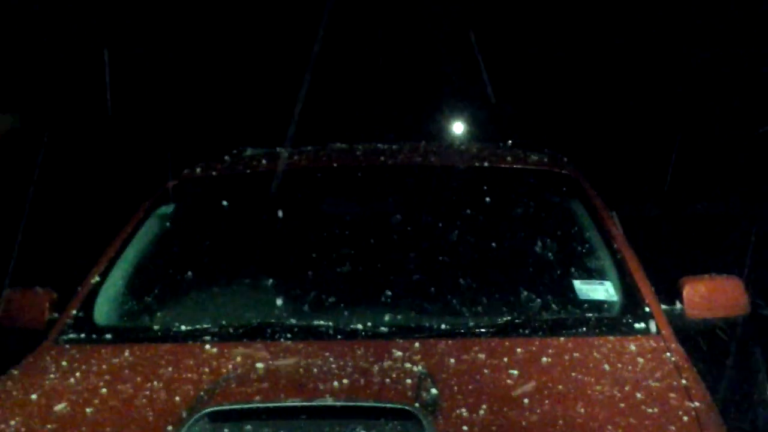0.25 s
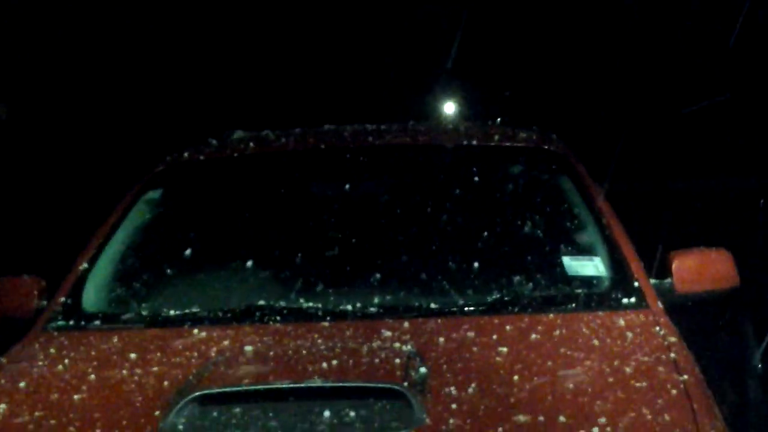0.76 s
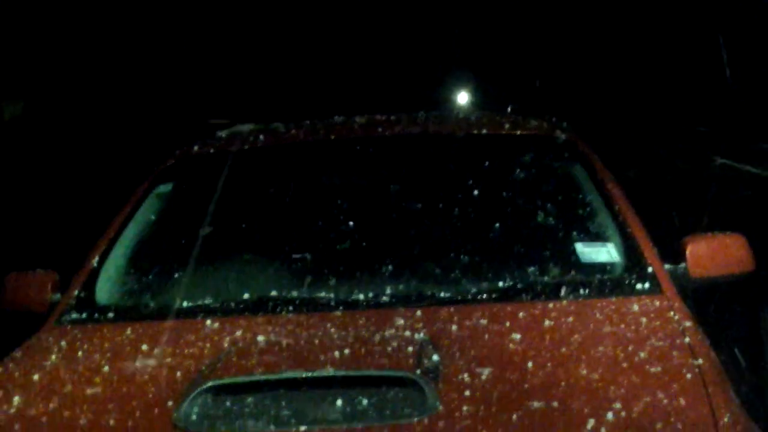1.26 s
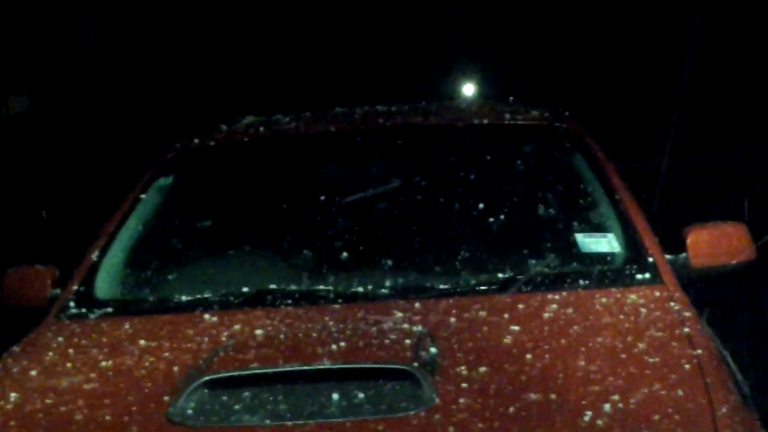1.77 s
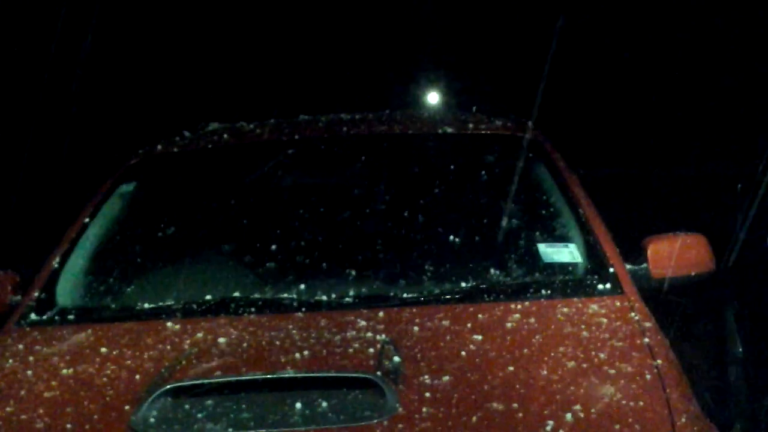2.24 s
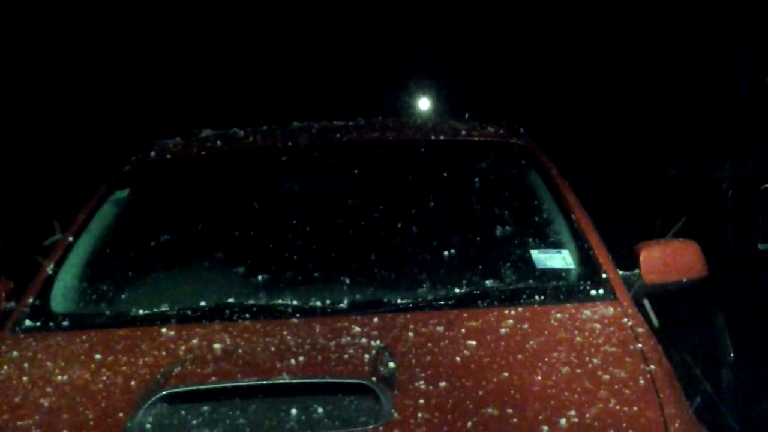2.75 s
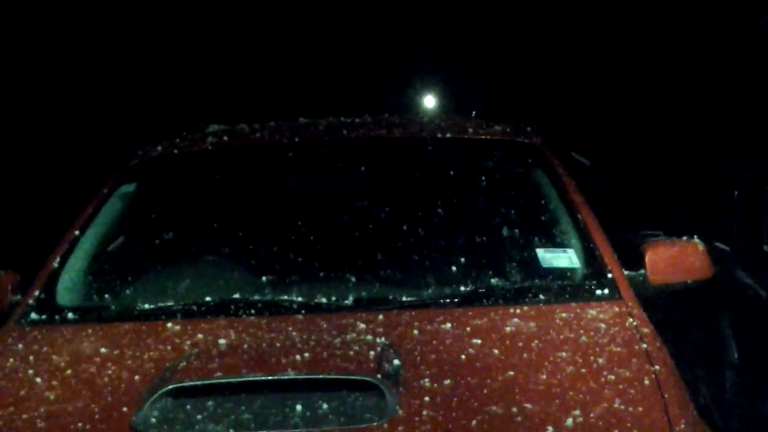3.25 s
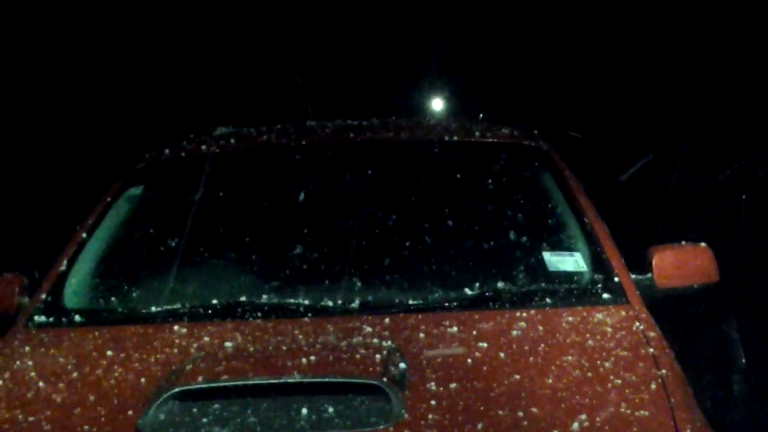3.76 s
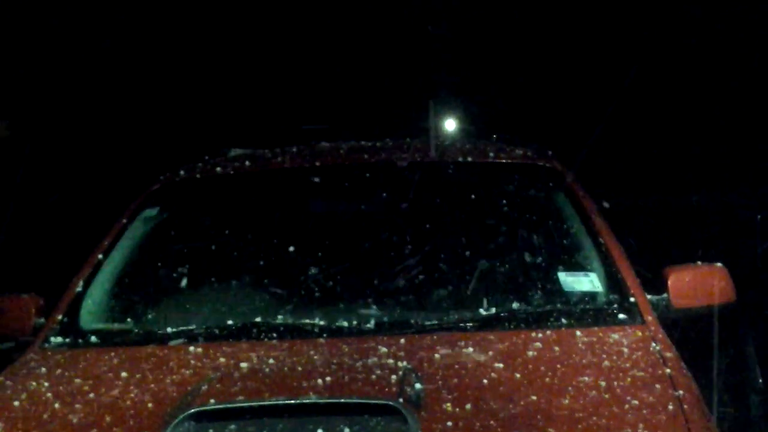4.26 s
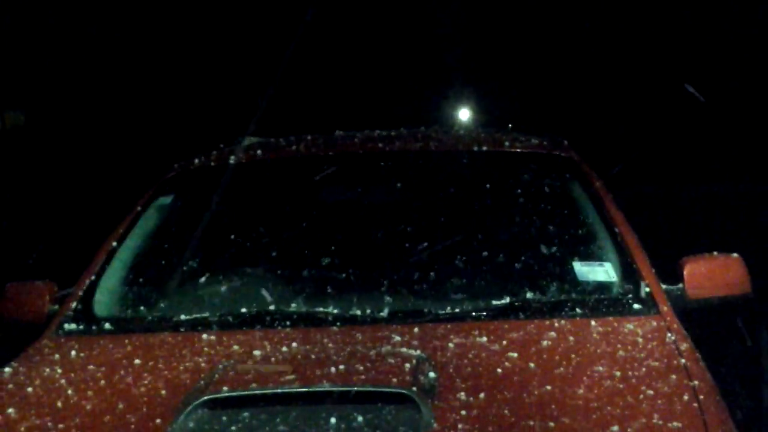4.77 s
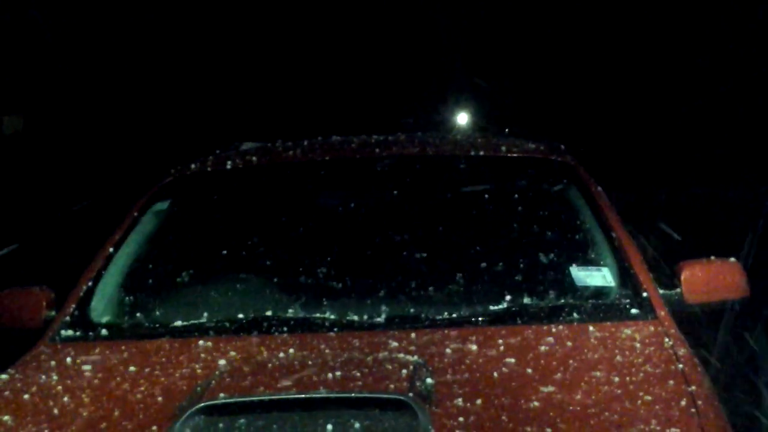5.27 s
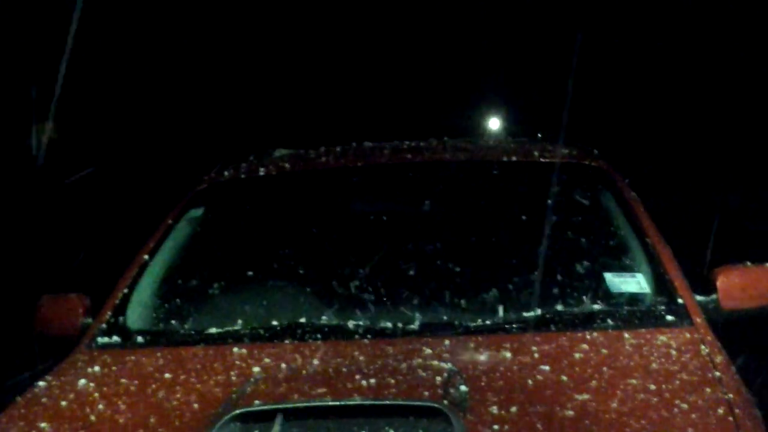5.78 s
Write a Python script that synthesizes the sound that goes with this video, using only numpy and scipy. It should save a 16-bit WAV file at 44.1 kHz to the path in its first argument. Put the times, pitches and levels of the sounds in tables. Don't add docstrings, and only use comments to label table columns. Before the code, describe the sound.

Heavy hail hammers a parked car at night, a dense metallic roar with crisp icy clatter and occasional sharp cracks of bigger stones.

```python
import sys
import numpy as np
from scipy import signal
from scipy.fft import rfft, irfft, dct
from scipy.io import wavfile

SR = 44100
rng = np.random.default_rng(int(sys.argv[2]) if len(sys.argv) > 2 else 0)


def wav_out(sig):
    wavfile.write(sys.argv[1], SR, np.round(np.clip(np.atleast_2d(sig).T, -1, 1) * 32767).astype(np.int16))


def how_loud(loudness_db):
    steps = np.asarray(loudness_db, float) / 20
    return 10 ** steps


N = 265299


def unit(x):
    return x / np.sqrt(np.mean(x ** 2) + 1e-20)


def coloured(x, points):
    m = 8192
    hz, db = np.transpose(points)
    gain = how_loud(np.interp(np.log(np.fft.rfftfreq(m, 1 / SR) + 1), np.log(hz), db))
    cepstrum = irfft(np.log(gain + 1e-6), m)
    cepstrum[1:m // 2] *= 2
    cepstrum[m // 2 + 1:] = 0
    response = irfft(np.exp(rfft(cepstrum)), m)
    return signal.fftconvolve(x, response)[:N]


def curves(rows):
    s, *columns = np.transpose(rows)
    return [np.interp(np.arange(N) / SR, s, column) for column in columns]


def surges(rows):
    t = np.arange(N) / SR
    return sum(db * np.exp(-abs(t - s) / np.where(t < s, rise_s, fade_s)) for s, db, rise_s, fade_s in rows)


def noise_bands(count, samples, centre_hz, log_widths):
    hz = np.fft.rfftfreq(samples, 1 / SR)
    bells = [np.exp(-(np.log((hz + 1) / c) / o) ** 2) for c, o in zip(centre_hz, log_widths)]
    noise = rng.standard_normal((count, samples))
    return [unit(band) for band in irfft(rfft(noise) * np.array(bells), samples)]


def impacts(count, spread_db, t60):
    hop, spots = 8192, 10
    spells = N // hop + 2
    t = np.arange(hop) / SR
    draw = rng.random((count, 2))
    size = how_loud(-spread_db * np.log(1 - draw[:, 1]))
    when = (draw[:, 0] * spells * spots * hop).astype(int)
    blows = np.bincount(when, size, spells * spots * hop)
    rings = rng.standard_normal((spells, spots, hop)) * how_loud(-60 * t / t60)
    spectra = rfft(blows.reshape(rings.shape), 2 * hop) * rfft(rings, 2 * hop)
    sound = irfft(spectra.sum(1), 2 * hop)
    return (sound[1:, :hop] + sound[:-1, hop:]).ravel()[:N]


def hail_fall():
    # [dB, brighter splinters]
    fall = [(0, -28.5, -1.5), (.4, -33, 2), (.8, -28.5, 0), (1.3, -30.5, 3.5), (1.6, -29, -8.5),
            (2, -29, 1), (2.45, -33, 1), (2.6, -32.5, 3), (2.9, -32, 1.5), (3.3, -29.5, 3),
            (3.55, -31.5, 0), (4.1, -30, 3), (4.35, -32, -2), (4.6, -28.5, 0.5), (5.1, -29.5, 2),
            (5.6, -29, 0), (5.8, -29, 0), (6.02, -31, 2)]
    # peak_s, over_fall_db [dB], fade_s
    flurries = [(.21, -4, 0.054), (0.251, 3, 0.025), (.3, 7.5, 0.037), (0.519, 5, 0.042), (0.865, 7, 0.021),
                (1.047, -0.5, 0.034), (1.09, -5.5, 0.036), (1.17, 5, 0.044), (1.541, 3.5, .05),
                (1.65, -3.5, 0.012), (1.68, 2, 0.033), (1.74, 3, 0.013), (1.825, 6, 0.014),
                (1.96, 1.5, 0.011), (2.26, 9.5, 0.012), (2.41, 6.5, 0.021), (2.58, 5, 0.046),
                (2.732, 1.5, 0.15), (3.03, 1.5, 0.042), (3.12, 0.5, .04), (3.278, 1.5, 0.057),
                (3.38, 3.5, 0.042), (4.2, 0.5, 0.086), (4.469, 5.5, .07), (4.88, 4, 0.068),
                (5.03, 3.5, 0.035), (5.23, 3, 0.015), (5.31, 3.5, 0.054), (5.46, 4, 0.028),
                (5.968, 6, 0.01)]
    gather_s = 0.016
    fall_db, hard_db = curves(fall)
    ice_db = fall_db + surges([(s, db, gather_s, fade_s) for s, db, fade_s in flurries])
    return ice_db, ice_db - ice_db.mean(), hard_db


def fine_spray(swing_db, hard_db):
    # frequency_hz, level_db
    spray_colour = [(9000, -19.5), (10300, -5), (11200, 0), (12000, -1), (13000, -9.5), (14400, -12.5),
                    (15000, -62)]
    spray = unit(coloured(impacts(count=30000, spread_db=1.5, t60=0.024), spray_colour))
    return how_loud(-53 + 0.55 * swing_db + 0.84 * hard_db) * spray


def glass_bursts():
    # start_s, peak_db, centre_hz, t60_s
    glass_hits = [(.05, -39, 11500, 0.14), (.862, -31, 11400, 0.083), (1.165, -30, 10600, .06),
                  (1.232, -34, 11400, 0.15), (1.684, -30, 13200, .14), (2.6, -42, 11800, 0.091),
                  (3.29, -38, 13000, 0.085), (4.43, -32, 12400, 0.11), (4.99, -34, 12600, 0.1),
                  (5.539, -37, 12200, 0.054), (5.95, -46, 12700, 0.06)]
    out, t = np.zeros(N + SR), np.arange(SR // 6) / SR
    for s, db, centre_hz, t60 in glass_hits:
        splash, = noise_bands(1, len(t), [centre_hz], [0.17])
        envelope = how_loud(db - 60 * t / t60) * (1 - np.exp(-t / 0.0062))
        out[round(s * SR):][:len(t)] += envelope * splash
    return out[:N]


def near_stones():
    # start_s, crack_peak_db, snap_over_crack_db, knock_over_crack_db
    big = [(0.0365, -27, -15, 12), (.2965, -12.5, -22, 1), (0.7307, -17, -13, 5.5), (0.8617, -19, -14, 0.5),
           (0.9895, -14, -17, 4.5), (1.044, -17.5, -10, 8), (1.1398, -25, -26, 16), (1.195, -22, -16, -18),
           (1.2326, -19, -8.5, 0), (1.6377, -17, -24, -5), (1.8242, -17.5, -13, -8.5),
           (2.5505, -11.5, -14, -8), (2.7397, -10.5, -34.5, 0), (2.7617, -13, -23, -4),
           (3.1056, -12, -31, -4), (3.1153, -18, 0, 6.5), (3.389, -13.5, -22, 6.5), (3.4188, -14, -41, -3),
           (3.7375, -17.5, -11, -4), (3.8053, -22, -28, -7), (4.2026, -29, -15, -5),
           (4.265, -34.5, -32, 29), (4.3548, -16.5, -16.5, 1), (4.4904, -20.5, -13, 11),
           (4.625, -29.5, -6, 0), (4.8226, -12.5, -31, 5), (5.3996, -22.5, -32, 3.5),
           (5.5198, -17.5, -21, 7), (5.6615, -9.5, -18, -5), (5.9399, -11, -17, -6)]
    lesser = [(rng.random() * N / SR, -21.5 + 3.5 * rng.standard_normal(), -18, 0) for _ in range(30)]
    out, t = np.zeros(N + SR), np.arange(SR // 8) / SR
    for s, db, snap_db, knock_db in big + lesser:
        crack, snap, knock = noise_bands(3, len(t), [3490, 6700, 1225], [0.73, 0.31, 0.78])
        sharp = how_loud(-60 * t / 0.022) * (how_loud(-9.0) * crack + how_loud(snap_db + 1.0) * snap)
        dull = how_loud(knock_db - 1.5 - 60 * t / 0.097) * knock
        onset = 1 - np.exp(-t / 0.0019)
        out[round(s * SR):][:len(t)] += how_loud(db) * onset * (sharp + dull)
    return out[:N]


def ice_clatter(ice_db, swing_db, hard_db):
    # frequency_hz, level_db
    ice_colour = [(1180, -41.5), (2000, -10.5), (2370, -9), (3800, -9.5), (6500, -24.5), (8450, -49),
                  (14300, -120)]
    # frequency_hz, level_db
    splinter_colour = [(3530, -10.5), (6000, -6.5), (8750, -1), (10500, -5.5), (13600, -20), (22000, -120)]
    shatter = impacts(count=30000, spread_db=1.5, t60=0.022)
    cracks = unit(coloured(shatter, ice_colour))
    fizz = unit(coloured(shatter, splinter_colour))
    ticks = unit(coloured(impacts(count=2500, spread_db=1.26, t60=0.015), ice_colour))
    fizz_db = -45 + 0.94 * swing_db + 0.22 * hard_db
    return how_loud(ice_db) * (cracks + how_loud(-10) * ticks) + how_loud(fizz_db) * fizz


def panel_roar(swing_db):
    # frequency_hz, level_db
    panel_colour = [(76, -56.5), (130, -33), (402, -3), (647, -1), (1180, -3), (1640, -9), (2600, -24.5),
                    (3380, -37), (5720, -120)]
    # peak_s, over_mean_db [dB]
    swells = [(.915, -2), (1.048, 3.5), (1.088, -1), (1.17, 1), (1.32, 2.5), (1.385, -3.5), (1.418, 2.6),
              (1.53, -4), (1.559, 2), (1.69, 0), (2.22, -2), (2.611, -1.5), (2.76, 2.4), (3.03, 2.5),
              (3.099, -3.5), (4.19, 2.6), (4.338, -2), (4.388, 0), (5.945, 2)]
    rise_s, fade_s = 0.016, 0.035
    roar = unit(coloured(impacts(count=20000, spread_db=1.5, t60=0.13), panel_colour))
    roar_db = -9 + 0.12 * swing_db + surges([(s, db, rise_s, fade_s) for s, db in swells])
    return how_loud(roar_db) * roar


def scene():
    ice_db, swing_db, hard_db = hail_fall()
    shower = fine_spray(swing_db, hard_db) + ice_clatter(ice_db, swing_db, hard_db) + panel_roar(swing_db)
    return (shower + glass_bursts() + near_stones())[None]


def camera_rounding(x):
    fine_moments = [.38, 1.05, 1.85, 2.15, 2.6, 3.3, 3.63, 3.67, 3.82, 4.03, 4.24, 4.37, 4.55, 4.82, 5.85,
                    5.97]
    step_db, drift_db, fine_db, tilt_db = -24.5, 1.27, -15.5, 2.6
    follow, rounding, top_hz = 0.4, 0.41, 14570
    hop, lead = 1024, 258
    fast = np.pad(signal.resample_poly(x, 160, 147), (hop + lead, 2 * hop))
    window = np.sin(np.pi * (np.arange(2 * hop) + 0.5) / (2 * hop))
    frames = np.lib.stride_tricks.sliding_window_view(fast, 2 * hop)[::hop] * window
    a, b, c, d = np.split(frames, 4, axis=1)
    lines = dct(np.hstack([-c[:, ::-1] - d, a - b[:, ::-1]]), 4, norm="ortho")
    treble_db = 10 * np.log10(np.mean(lines[:, 260:420] ** 2, 1) + 1e-9)
    frame_db = step_db + follow * (treble_db - np.median(treble_db))
    frame_db = frame_db + drift_db * rng.standard_normal(len(lines))
    frame_db[np.round((np.array(fine_moments) * 48000 + lead) / hop).astype(int)] += fine_db
    step = how_loud(frame_db[:, None] + tilt_db * (np.arange(hop) / 512 - 1.86))
    level = np.floor((abs(lines) / step) ** (3 / 4) + rounding)
    below_top = np.arange(hop) * 24000 / hop < top_hz
    lines = np.sign(lines) * level ** (4 / 3) * step * below_top
    u, v = np.split(dct(lines, 4, norm="ortho"), 2, axis=1)
    frames = np.hstack([v, -v[:, ::-1], -u[:, ::-1], -u]) * window
    fast = (frames[1:, :hop] + frames[:-1, hop:]).ravel()[lead:]
    return signal.resample_poly(fast, 147, 160)[:N]


def roll_off(x):
    return signal.sosfilt(signal.butter(12, 15900, fs=SR, output="sos"), x)


def record(dry):
    mic = signal.sosfilt(signal.butter(2, 125, "high", fs=SR, output="sos"), dry[0])
    rounded = camera_rounding(np.clip(mic, -1, 1))
    return roll_off(np.clip(rounded, -1, 1)[None])


dry = scene()
out = record(dry)
wav_out(out)
```